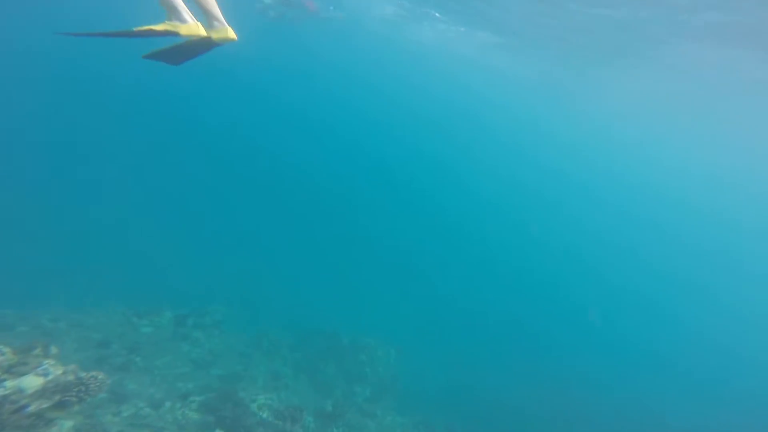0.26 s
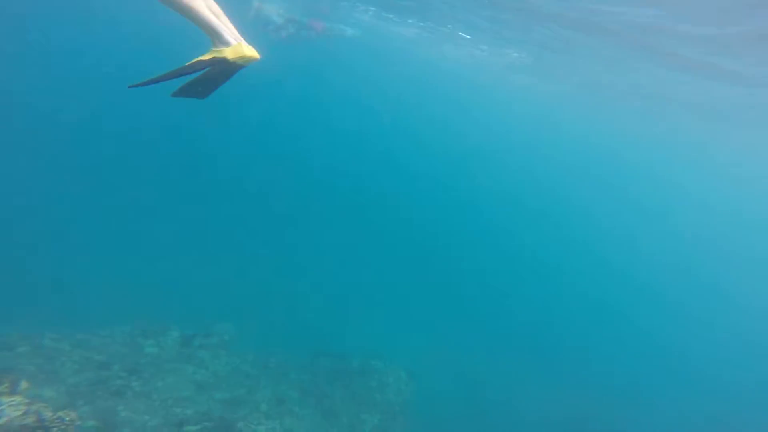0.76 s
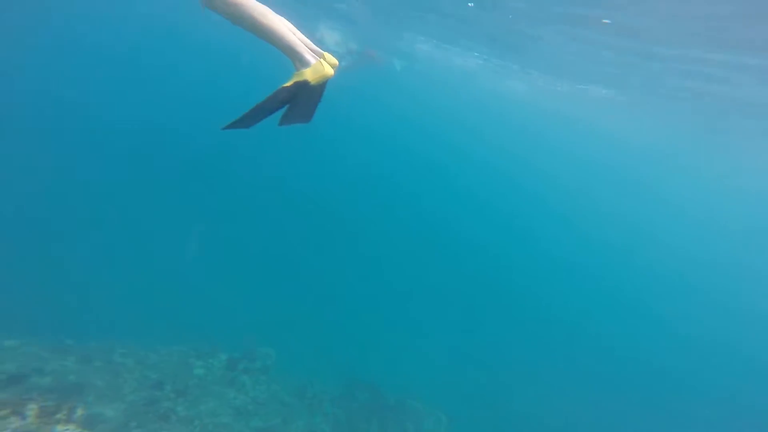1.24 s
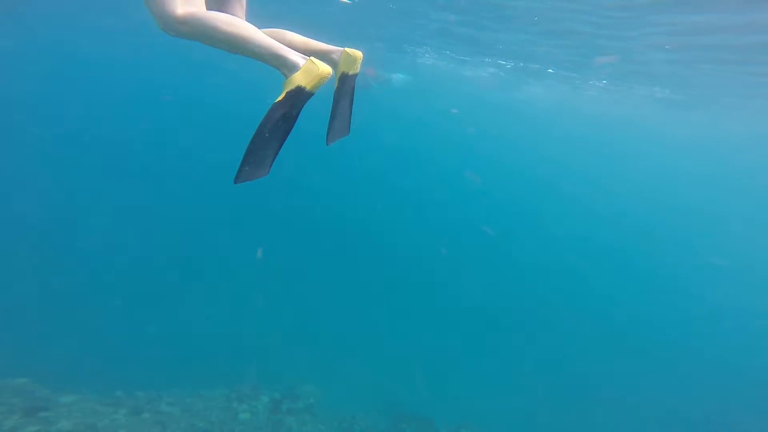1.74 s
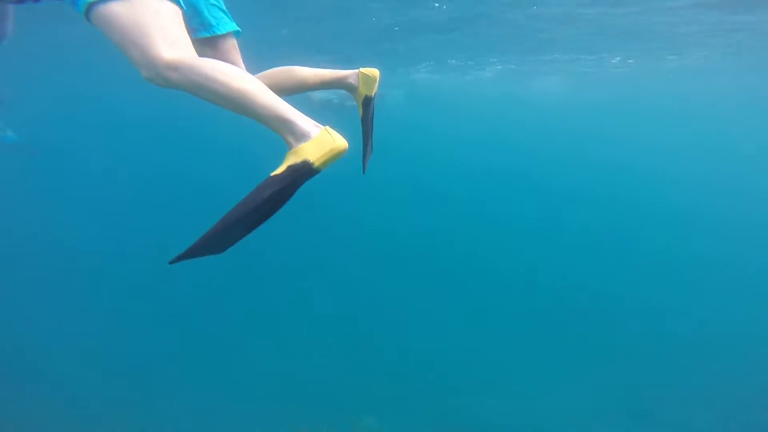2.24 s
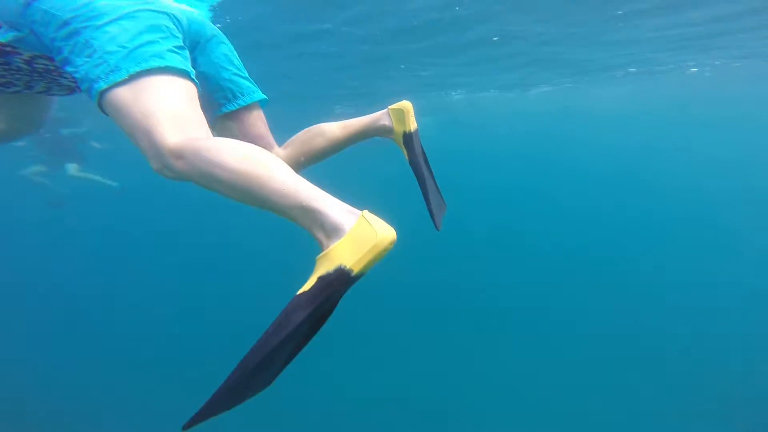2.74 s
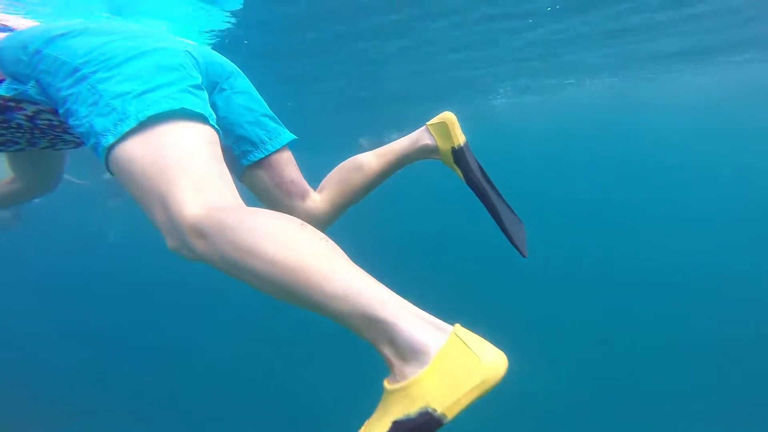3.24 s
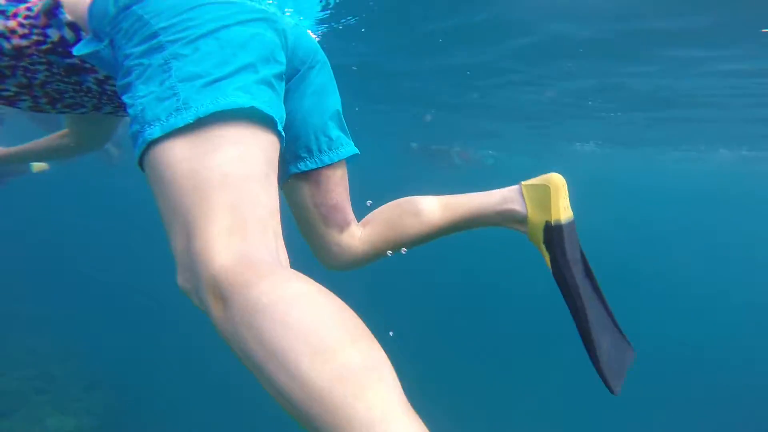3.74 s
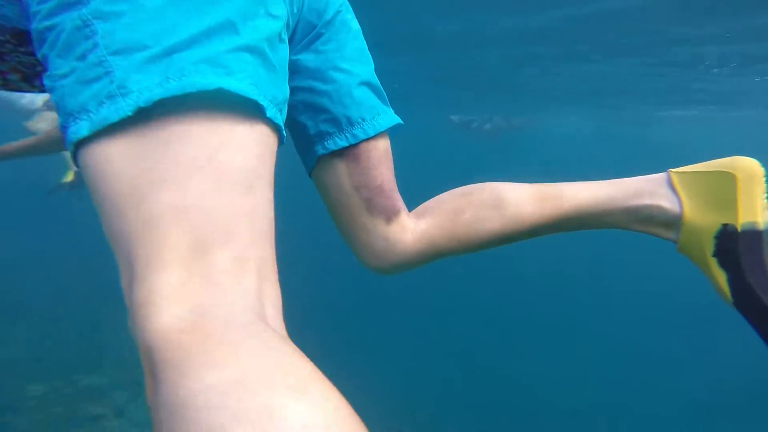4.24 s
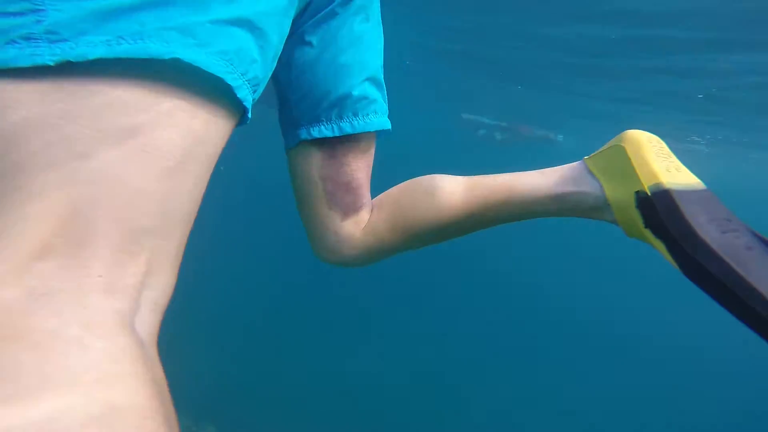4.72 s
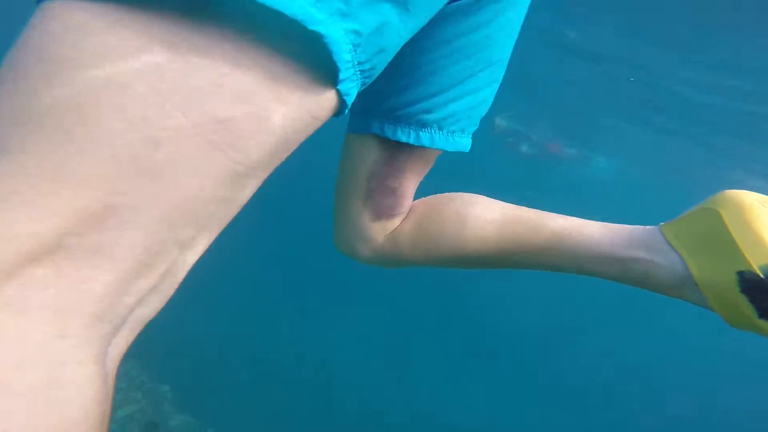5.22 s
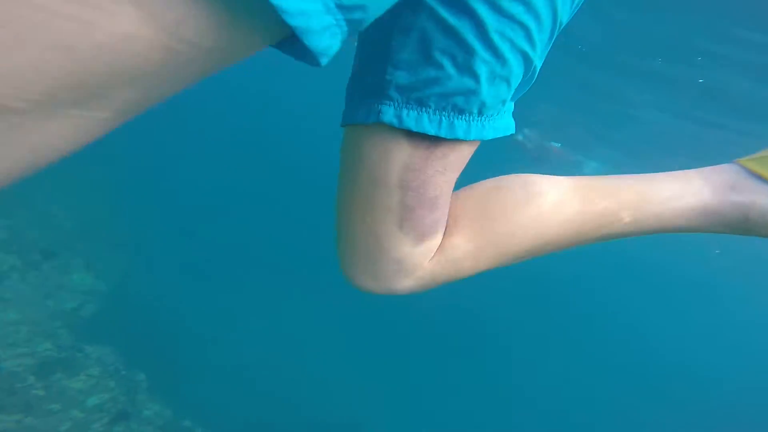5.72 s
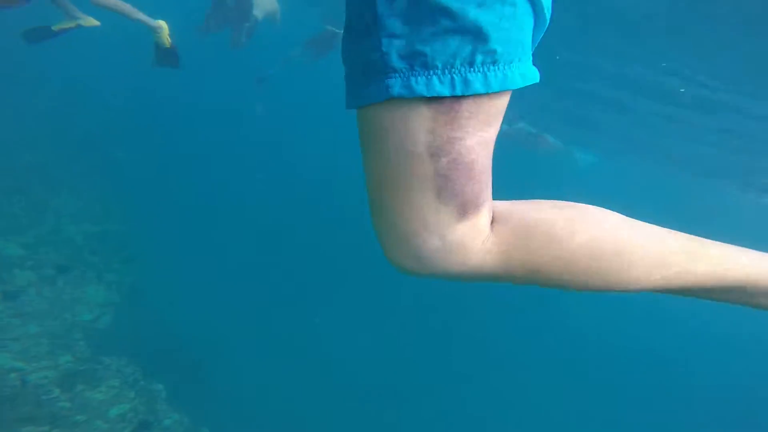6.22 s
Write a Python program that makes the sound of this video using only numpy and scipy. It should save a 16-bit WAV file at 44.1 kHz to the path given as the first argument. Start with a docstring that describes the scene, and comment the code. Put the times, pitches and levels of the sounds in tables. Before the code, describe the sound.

Underwater reef crackling like frying fat, with soft water movement, several deep thumps, hard little clicks and one faint brief creak close by.

```python
"""Snapping shrimp over a reef

Under the sea, heard from inside a sealed camera housing on a hand-held pole. Shrimp near and far are
short noise cracks, with hiss behind the far ones, all ringing the housing resonances. Bumps are damped
low sines with a knock; ticks of a loose plastic part, a few low knocks and faint slips are falling sines
with scraping noise; the mount creaks once as a train of slips. Water is shaped noise in slow lumps;
the microphone adds hiss."""
import sys
import numpy as np
from scipy.fft import rfft, irfft, next_fast_len
from scipy.io import wavfile
from scipy.ndimage import map_coordinates

SR = 44100
rng = np.random.default_rng(int(sys.argv[2]) if len(sys.argv) > 2 else 0)


def to_wav(sig):
    """Store sig (one row per channel, or 1-D mono) as 16-bit WAV at the path in sys.argv[1].

    Samples outside -1..1 are clipped; the rate is SR.
    """
    pcm = np.clip(np.atleast_2d(sig), -1, 1) * 32767
    pcm = np.round(pcm).astype(np.int16)
    wavfile.write(sys.argv[1], SR, pcm.T)  # frames by channels


N = 285327

# Loudest shrimp. Each row: start in seconds, nominal peak in dB, 5-9 kHz and 9-15 kHz level in dB
# against the peak; the last two steer the colour by their deviation from the mean.
NEAR_SNAPS = [(0.044, -27.5, -15, -17.5), (0.0784, -17.5, -23, -17), (0.218, -22.5, -15, -20),
              (0.2386, -24.5, -12, -15), (0.2959, -25.5, -11, -20), (0.3573, -22, -8, -25),
              (0.3604, -26, -13, -21), (0.3835, -24, -16, -17.5), (0.456, -32, -14, -14),
              (0.5002, -21.5, -15, -18.5), (0.5524, -25.5, -10.5, -17.5), (0.6768, -24.5, -20, -25),
              (0.7313, -28, -16, -12), (0.927, -25.5, -15, -21), (0.9395, -23.5, -16, -27),
              (0.9597, -21, -15, -22), (1.1915, -23, -17, -22.5), (1.2093, -23.5, -11, -24),
              (1.2218, -24, -16, -22), (1.3256, -19, -22, -21), (1.366, -28, -14, -16.5),
              (1.446, -17.5, -21, -30), (1.46, -20, -20, -20), (1.53, -33, -13, -17),
              (1.5603, -19.5, -19.5, -31), (1.6087, -31, -21, -21), (1.6218, -23.5, -21, -27),
              (1.6596, -25.5, -10, -16), (1.7168, -24, -14, -24), (1.8168, -17, -20, -21.5),
              (1.943, -25.5, -13, -30), (1.9789, -25.5, -11, -23), (2.0255, -25, -18, -21),
              (2.0472, -17.5, -14.5, -29), (2.064, -22, -13, -19.5), (2.146, -27, -16.5, -22),
              (2.1895, -26.5, -9, -14.5), (2.2263, -26, -11, -27), (2.2417, -23, -24, -24),
              (2.2556, -23.5, -18, -26), (2.3575, -30, -14, -16), (2.3643, -29, -8, -18),
              (2.5313, -12.5, -21.5, -27), (2.5955, -23, -13, -18), (2.6276, -29, -22, -25),
              (2.6433, -17.5, -26, -27), (2.6718, -27, -19, -25), (2.7417, -32, -8, -17.5),
              (2.7579, -28, -7, -16), (2.8769, -26.5, -23, -26), (2.9183, -18, -15, -23),
              (2.9403, -19, -13.5, -17.5), (2.9573, -21.5, -14, -23), (2.9844, -26, -9, -15),
              (3.017, -25.5, -13, -12), (3.0596, -26, -20, -20), (3.069, -18, -18.5, -19),
              (3.137, -20.5, -31, -25), (3.2646, -20, -16.5, -27), (3.2745, -18, -14, -35),
              (3.3331, -27.5, -13, -16), (3.3584, -27, -21, -22), (3.3703, -27.5, -22, -28),
              (3.5284, -23, -11, -32), (3.5478, -21, -25, -23), (3.6668, -22.5, -22, -27),
              (3.7017, -22.5, -21, -26), (3.8255, -18, -30, -35), (3.8914, -25, -26, -16),
              (3.9, -29, -17, -17), (3.9413, -24.5, -7.5, -19), (4.0191, -21, -14, -21.5),
              (4.0491, -24.5, -15, -16), (4.151, -22, -10, -24.5), (4.1678, -25.5, -14, -13),
              (4.2002, -28.5, -9, -19), (4.218, -25, -12, -20), (4.2463, -20, -17, -23),
              (4.254, -16, -18, -28), (4.3037, -22.5, -21, -17), (4.3312, -25, -15, -24),
              (4.368, -20.5, -25, -24), (4.4852, -23, -5, -33), (4.5507, -22, -17, -23),
              (4.592, -25, -22, -24), (4.639, -18.5, -16, -24), (4.7112, -27, -16.5, -19),
              (4.7391, -24.5, -13, -22), (4.7669, -27, -10, -22), (4.858, -21.5, -18, -19),
              (4.8853, -21.5, -14, -23), (4.9258, -34.5, -3.5, -22), (4.9482, -24, -11.5, -24),
              (5.0245, -21.5, -12, -18.5), (5.035, -29, -14, -19), (5.1292, -23, -13.5, -25),
              (5.1694, -23.5, -11, -19), (5.223, -30, -10.5, -14), (5.244, -22, -19, -16.5),
              (5.3144, -21.5, -13, -19), (5.332, -24, -13, -27), (5.3465, -20, -11, -33),
              (5.3597, -26, -24, -25), (5.3772, -22, -22, -21), (5.4302, -17, -24, -19.5),
              (5.5055, -26, -8.5, -20.5), (5.5198, -29, -14, -19), (5.619, -32.5, -4, -20),
              (5.6401, -25.5, -11, -20), (5.694, -26.5, -11, -15.5), (5.742, -32, -6.5, -16),
              (5.8127, -22, -23, -23), (5.9353, -24, -15, -18), (5.9926, -24.5, -9.5, -21),
              (5.999, -26, -21, -25), (6.044, -18.5, -19.5, -33), (6.1535, -27.5, -19, -16.5),
              (6.1908, -21.5, -16, -29), (6.257, -28, -13, -22), (6.313, -26, -23, -22),
              (6.4077, -36.5, -14, -11.5)]
# Housing resonances. Each row: centre in Hz, width in Hz, level in dB.
HOUSING_MODES = [(1242, 244, -9), (1584, 156, -1), (2619, 304, 2.5), (3496, 393, 0), (4025, 397, 1),
                 (5810, 1500, -6.5), (7656, 484, -2.5), (9280, 570, -9), (10640, 680, -10),
                 (11820, 1800, -17)]
# Bumps. Each row: start in seconds, rocking peak in dB, direction as a sign, small-swing rocking rate in Hz,
# push time constant in seconds, knock gain in dB.
BUMP_EVENTS = [(.006, -33, 1, 142, 0.0026, -60), (0.674, -14.5, 1, 64, 0.0025, -13),
               (0.7216, -21.5, 1, 76, 0.0046, -50), (0.78, -29.5, 1, 64, 0.009, -51),
               (0.832, -29, -1, 51, .004, -59), (.868, -22.5, 1, 22.2, 0.014, -61),
               (2.42, -20, -1, 60.6, .005, -74), (2.812, -13, -1, 64.4, 0.0015, -7.5),
               (3.2182, -30, 1, 65, 0.0025, -47), (3.509, -32.5, -1, 56, 0.0036, -45),
               (3.743, -21.5, 1, 61, .0024, -20.5), (3.85, -13, -1, 157, 0.0022, -43),
               (3.861, -13.5, 1, 107.6, 0.0018, -17), (3.878, -17.5, 1, 64.3, 0.0018, -31),
               (3.904, -9.5, -1, 61.6, 0.003, -36), (3.985, -23, -1, 69, 0.023, -45),
               (4.238, -2.5, -1, 63.7, .2, -8), (5.035, -29, -1, 65.5, 0.0016, -34),
               (5.073, -15.5, -1, 64.7, 0.0011, -47)]
# Shell modes of the knock. Each row: frequency in Hz, level in dB, t60 in seconds.
KNOCK_MODES = [(124, -1, 0.091), (197, -9.5, 0.075)]
# Ticks of a loose part, a few low knocks, and faint slips after the creak. Each row: start in seconds,
# nominal low mode in Hz, low mode level in dB, pitch factor of the upper modes, upper mode gain in dB,
# scrape gain in dB.
TICK_AND_SLIP_EVENTS = [(.669, 950, -40, 1.15, -27, -33), (.682, 327, -31, 1.2, -31, -32),
                        (0.736, 1260, -49, .9, -24.5, -38), (0.926, 273, -37, 1, -60, -47),
                        (2.815, 1030, -45, 1.06, -24.5, -56), (3.215, 984, -18, 1.2, -19, -24.5),
                        (3.84, 806, -17, 0.89, -3.5, -19), (3.8475, 900, -48, 1.2, -20, -15.5),
                        (3.855, 732, -20.5, 1.2, -13, -19), (3.858, 426, -18, 1, -34, -20.5),
                        (3.863, 780, -27, 1.11, -15, -33), (4.048, 1130, -38, .7, -49, -57),
                        (4.231, 600, -40, 1, -55, -35.5), (4.241, 347, -26, 1, -44, -28.5),
                        (5.07, 1020, -10, 0.95, -7, -23), (5.98, 1130, -39, 1, -60, -41),
                        (6.015, 1200, -40, 1, -57, -47), (6.172, 1080, -45.5, 1, -57, -44)]
# Upper modes of these events. Each row: frequency in Hz before the pitch factor and glide,
# level in dB, t60 in seconds.
TICK_UPPER_MODES = [(2093, 1, 0.011), (2640, -11.5, 0.018)]
# Spectrum of rough contact. Each row: frequency in Hz, relative density in dB per Hz.
SCRAPE_SPECTRUM = [(60, -3), (200, -0.5), (600, -1), (1400, -13), (2300, -2), (3200, -18), (6000, -48)]
# Resonances of the creaking joint. Each row: centre in Hz, half the width in Hz, level in dB.
JOINT_MODES = [(740, 110, -3.5), (1100, 103, 0), (1330, 123, -0.5), (1930, 110, -2.5), (2590, 120, -5.5)]
# Slosh level over time. Each row: time in seconds, level in dB.
SLOSH_LEVEL = [(0.0, -38), (0.41, -39), (0.85, -33), (1.31, -42), (3.03, -39.5), (3.51, -46), (3.73, -38.5),
               (3.89, -22), (4.02, -39), (4.61, -41.5), (4.96, -42), (5.33, -42), (6.07, -39),
               (6.47, -42.5)]
# Spectrum of water pressing on the housing. Each row: frequency in Hz, relative density in dB per Hz.
SLOSH_SPECTRUM = [(8, -18), (20, 2.5), (45, -3.5), (68, -4), (95, -17.5), (200, -59)]
# Spectrum of water swirling along it. Each row: frequency in Hz, relative density in dB per Hz.
SWIRL_SPECTRUM = [(60, -17.5), (110, -1.5), (200, -7.5), (350, -12.5), (600, -24), (1500, -48)]
# Spectrum of microphone noise. Each row: frequency in Hz, relative density in dB per Hz.
HISS_SPECTRUM = [(100, -22), (300, 0), (730, 1), (1000, -1), (2500, -7), (8000, -18), (15000, -15.5)]

LOW_TINT_MEAN_DB, LOW_TINT_SPREAD_DB = -4.5, 4.5  # below about 1.6 kHz, snap by snap
ROCK_CYCLES = 10.9  # nominal swings per 60 dB of decay
KNOCK_LEAD_S = 0.0037
CREAK_S, CREAK_LENGTH_S, CREAK_DB = 5.817, 0.12, -38
SWIRL_DB, SWIRL_FOLLOW = -55.5, 0.46  # dB of swirl per dB of slosh
CROWD_COUNT = 2600
FAR_DB, FAR_FADE_DB_PER_S = -35.5, 0.49  # fades as the reef drops away
HAZE_DB = -5.5  # against the far crackle
HISS_DB, ROLLOFF_HZ, TOP_HZ = -57.0, 15300, 16400


def amp(db):
    """dB to gain."""
    return 10 ** (np.asarray(db) / 20)


def unit(x):
    """Scale to rms 1."""
    return x / np.sqrt(np.mean(x ** 2) + 1e-20)


def wobble(rate_hz):
    """Smooth random curve with rate_hz knots per second."""
    knots = rng.standard_normal(int(N * rate_hz / SR) + 4)
    return map_coordinates(knots, [np.arange(N) * rate_hz / SR])


def filtered(x, response):
    """Apply a complex response of frequency in Hz."""
    m = next_fast_len(N + SR // 2)
    return irfft(rfft(x, m) * response(np.fft.rfftfreq(m, 1 / SR)), m)[:N]


def coloured(spectrum):
    """Noise of rms 1, its spectrum interpolated on a log-frequency axis."""
    f, db = np.transpose(spectrum)
    gain = lambda hz: amp(np.interp(np.log(hz + 1), np.log(f), db))
    return unit(filtered(rng.standard_normal(N), gain))


def resonances(modes):
    """Causal response of parallel damped resonators, alternating in sign."""
    def response(f):
        total = 0
        for k, (centre, width, db) in enumerate(modes):
            damping = 1j * f * width
            total = total + (-1) ** k * amp(db) * damping / (centre ** 2 - f ** 2 + damping)
        return total
    return response


def above(hz, edge_hz):
    """Smooth step from 0 below the edge to 1 above it."""
    return 1 / (1 + (edge_hz / (hz + 1)) ** 10)


def add(track, start_s, sound):
    """Mix a sound into the track."""
    part = track[round(start_s * SR):][:len(sound)]
    part += sound[:len(part)]


def bursts(start_s, db, t60_s, echo_db, colour_db):
    """Noise cracks of unit energy at 0 dB before colouring, each with a sparse weak scattered tail."""
    length, pad = 512, 64
    t = np.arange(length) / SR
    size = (len(start_s), length)
    direct = np.minimum(t / 0.00036, 1) * amp(-60 * t / t60_s)
    echoes = amp(echo_db - 60 * t / 0.048) * (rng.random(size) < 0.3)
    cracks = (direct + echoes) * rng.standard_normal(size)
    cracks *= amp(db)[:, None] / np.linalg.norm(cracks, axis=1, keepdims=True)
    cracks = np.pad(cracks, ((0, 0), (pad, pad)))  # room for the zero-phase filter
    hz = np.fft.rfftfreq(cracks.shape[1], 1 / SR)
    cracks = irfft(rfft(cracks) * amp(colour_db(hz)))
    at = (np.asarray(start_s) * SR).astype(int)[:, None] + np.arange(cracks.shape[1])
    return np.bincount(at.ravel(), cracks.ravel(), N + pad)[pad:N + pad]


def near_shrimp():
    """Near claws snap one by one, bright or dull, and ring the housing."""
    start_s, db, treble_db, top_db = np.transpose(NEAR_SNAPS)
    lag, turn, low_draw = rng.random((len(start_s), 3)).T[:, :, None]
    low_db = LOW_TINT_MEAN_DB + LOW_TINT_SPREAD_DB * np.sqrt(12) * (low_draw - 0.5)
    mid_db = 1.26 * (treble_db - treble_db.mean()) - 3.5
    high_db = 1.4 * (top_db - top_db.mean()) - 2.0

    def colour_db(hz):
        # a random ripple over frequency varies the colour of each snap
        ripple = 3 * np.cos(2 * np.pi * (hz * (0.000201 + 0.000601 * lag) + turn))
        low = low_db * (1 - above(hz, 1600))
        mid = np.outer(mid_db, above(hz, 5000) - above(hz, 9450))
        high = np.outer(high_db, above(hz, 8770))
        return ripple + low + mid + high

    cracks = bursts(start_s, db, 0.0058, -13, colour_db)
    near = filtered(cracks, resonances(HOUSING_MODES))
    peaks = [np.abs(near[round(s * SR):][:SR // 200]).max() for s in start_s]
    return near * np.median(amp(db) / peaks)  # one gain for all: nominal peaks hold in the median


def bumps():
    """Each bump rocks the housing on its mount, after a short knock of the shell the other way."""
    out, t = np.zeros(N), np.arange(SR // 2) / SR
    knock = sum(amp(db - 60 * t / t60_s) * np.sin(2 * np.pi * hz * t) for hz, db, t60_s in KNOCK_MODES)
    knock *= 1 - np.exp(-(t / 0.0032) ** 2)
    for start_s, db, direction, hz, push_s, knock_db in BUMP_EVENTS:
        swing = (1 - np.exp(-t / push_s)) * (1 - np.exp(-(t / 0.0016) ** 2))
        swing *= amp(-60 * t * hz / ROCK_CYCLES)
        swing *= amp(db) / swing.max()
        cycles = np.cumsum(hz * (1 + 0.14 * swing)) / SR  # the mount stiffens in wide swings
        add(out, start_s, direction * swing * np.sin(2 * np.pi * cycles))
        add(out, start_s - KNOCK_LEAD_S, -direction * amp(knock_db) * knock)
    return out


def ticks_and_slips():
    """Ticks of a loose part, a few low knocks, and faint slips after the creak: sagging modes and scrape."""
    out, t = np.zeros(N), np.arange(SR // 8) / SR
    # running integrals of the pitch factors, in seconds
    low_glide_s = np.cumsum(0.904 + 0.25 * np.exp(-t / 0.016)) / SR
    upper_glide_s = np.cumsum(1 + 0.53 * np.exp(-t / 0.00097)) / SR
    rough = coloured(SCRAPE_SPECTRUM)
    for start_s, low_hz, low_db, pitch, upper_db, scrape_db in TICK_AND_SLIP_EVENTS:
        low = amp(low_db - 60 * t / 0.048) * (1 - np.exp(-t / 0.00056))
        low *= np.sin(2 * np.pi * low_hz * low_glide_s)
        upper = sum(amp(db - 60 * t / t60_s) * np.sin(2 * np.pi * hz * pitch * upper_glide_s)
                    for hz, db, t60_s in TICK_UPPER_MODES)
        upper *= amp(upper_db) * (1 - np.exp(-t / 0.001))
        scrape = amp(scrape_db - 60 * t / 0.035) * (1 - np.exp(-t / 0.0023))
        scrape *= rough[round(start_s * SR):][:len(t)]
        add(out, start_s, low + upper + scrape)
    return out


def creak():
    """Stick-slip in the joint: uneven slips that slow down and darken towards the end."""
    count = 24
    gaps = np.geomspace(3, 8, count) * np.exp(0.45 * rng.standard_normal(count))  # relative
    slip_s = CREAK_S + (np.cumsum(gaps) - gaps[0]) * CREAK_LENGTH_S / gaps[1:].sum()
    tilt_db_per_octave = 1.5 * rng.standard_normal(count) + np.linspace(3, -4, count)
    size_db = 4 * rng.standard_normal(count)

    def colour_db(hz):
        octaves = np.log2(hz / 1400 + 0.15).clip(-2, 2)
        return np.outer(tilt_db_per_octave, octaves)

    slips = bursts(slip_s, size_db, 0.0015, -22.5, colour_db)
    slips = filtered(slips, resonances([(hz, 2.0 * half_hz, db) for hz, half_hz, db in JOINT_MODES]))
    t = np.arange(N) / SR
    during = (t > slip_s[0]) & (t < slip_s[-1])
    return amp(CREAK_DB) * slips / np.sqrt(np.mean(slips[during] ** 2))


def water():
    """Water presses on the housing in slow lumps and swirls faintly along it: two shaped noises."""
    time_s, level_db = np.transpose(SLOSH_LEVEL)
    slosh_db = np.interp(np.arange(N) / SR, time_s, level_db)
    slosh = unit(amp(3 * wobble(16)) * coloured(SLOSH_SPECTRUM))
    swirl_db = SWIRL_DB + SWIRL_FOLLOW * (slosh_db - slosh_db.mean())
    swirl = unit(amp(2.8 * wobble(25)) * coloured(SWIRL_SPECTRUM))
    return amp(slosh_db) * slosh + amp(swirl_db) * swirl


def far_shrimp():
    """Farther claws crackle densely and melt into hiss, through the housing resonances."""
    start_draw, size_draw = rng.random((CROWD_COUNT, 2)).T
    low_tint, treble_tint, top_tint = rng.standard_normal((CROWD_COUNT, 3)).T
    size_db = -4.5 * np.log(size_draw.clip(0.02))  # many weak snaps, few strong

    def colour_db(hz):
        low = np.outer(4 * low_tint, above(hz, 2070))
        treble = np.outer(5 * treble_tint, above(hz, 8000))
        top = np.outer(5 * top_tint, above(hz, 12600))
        return low + treble + top

    crackle = unit(bursts(start_draw * N / SR, size_db, 0.0026, -30.0, colour_db))
    haze = amp(HAZE_DB + 1.83 * wobble(30)) * rng.standard_normal(N)
    level_db = FAR_DB - FAR_FADE_DB_PER_S * np.arange(N) / SR
    return filtered(amp(level_db) * (crackle + haze), resonances(HOUSING_MODES))


def scene():
    """All sources sum at one microphone."""
    return (near_shrimp() + bumps() + ticks_and_slips() + creak() + water() + far_shrimp())[None]


def record(dry):
    """The microphone adds hiss; the top treble rolls off steeply and nothing stays above the band limit."""
    heard = dry[0] + amp(HISS_DB) * coloured(HISS_SPECTRUM)
    return filtered(heard, lambda hz: (hz < TOP_HZ) / (1 + (hz / ROLLOFF_HZ) ** 30))[None]


dry = scene()
out = record(dry)
to_wav(out)
```